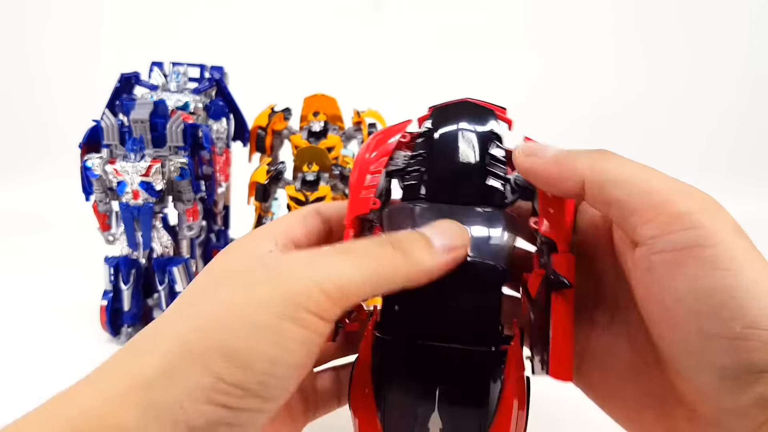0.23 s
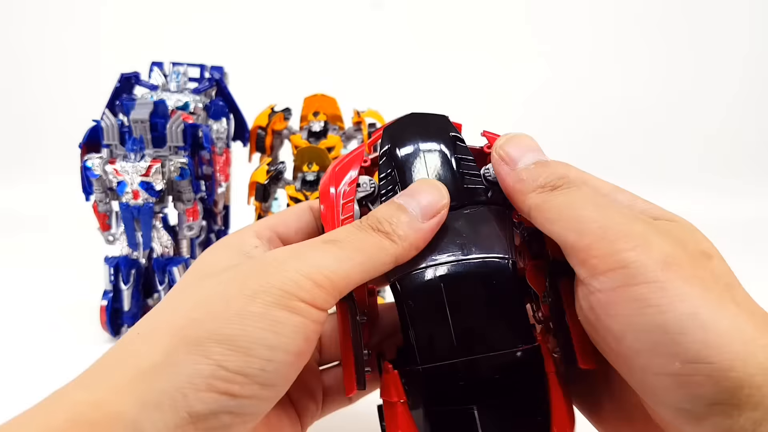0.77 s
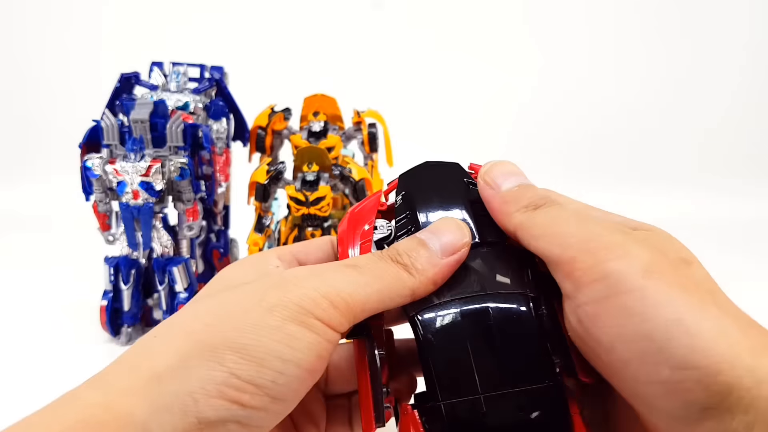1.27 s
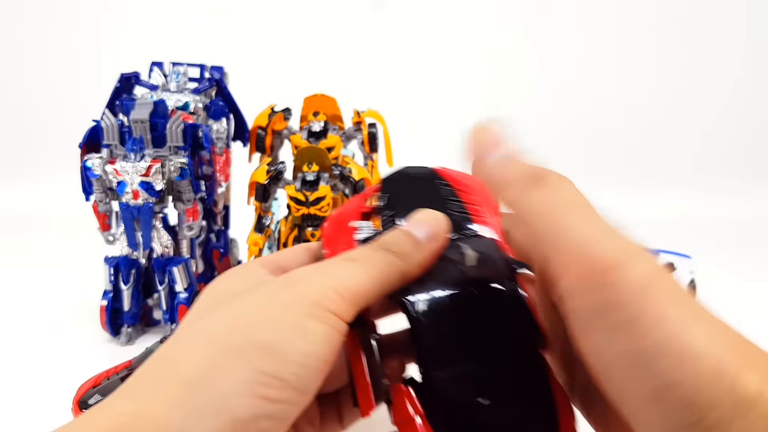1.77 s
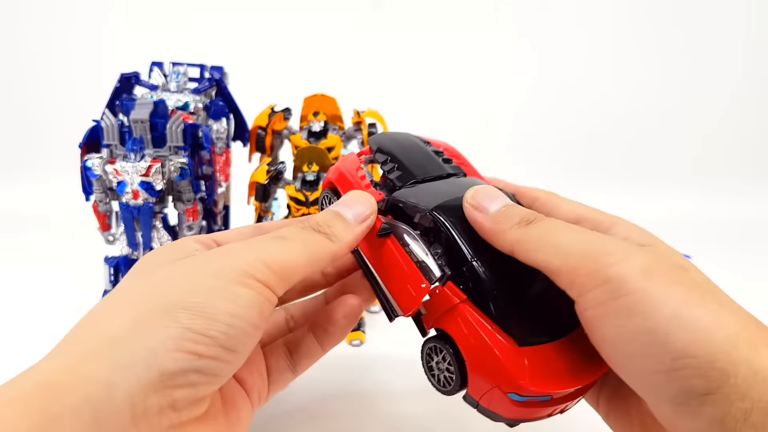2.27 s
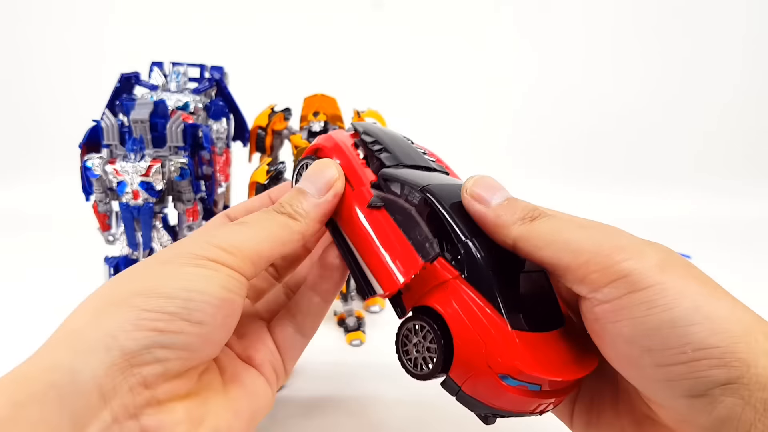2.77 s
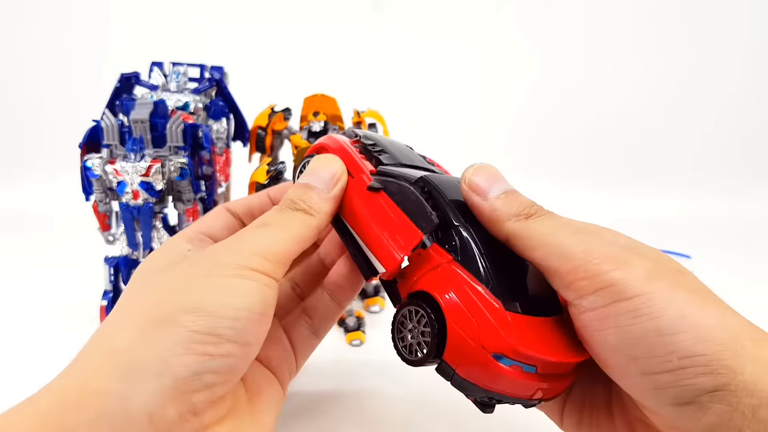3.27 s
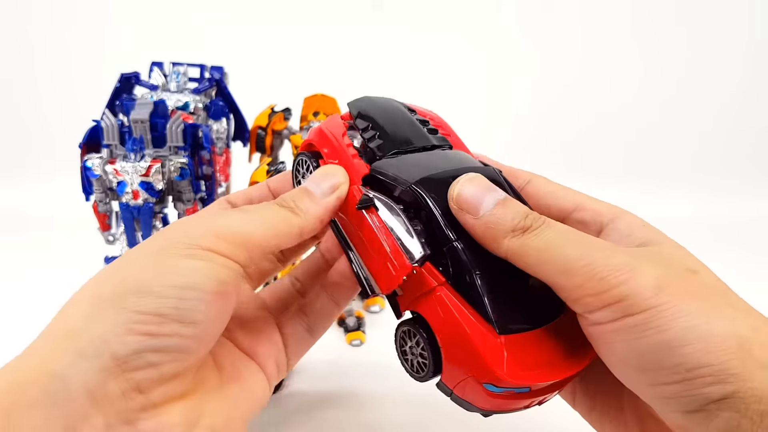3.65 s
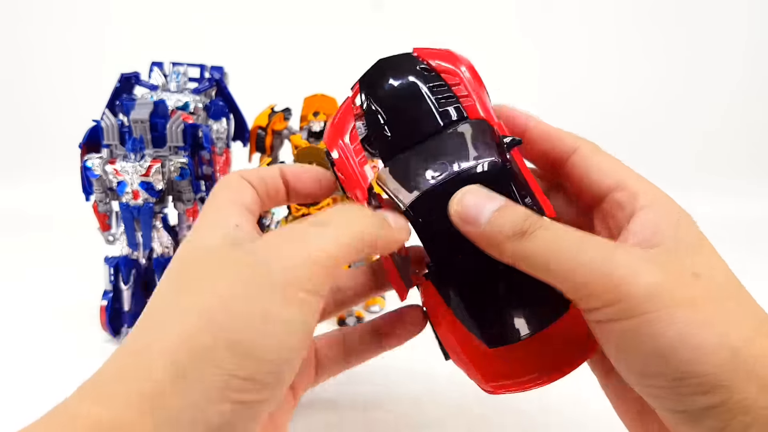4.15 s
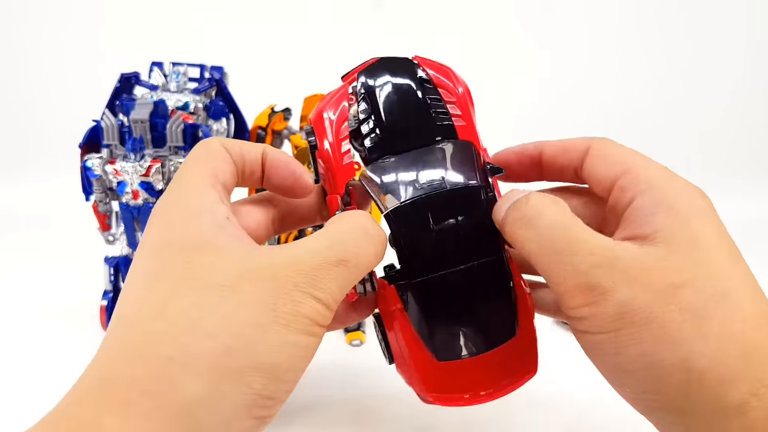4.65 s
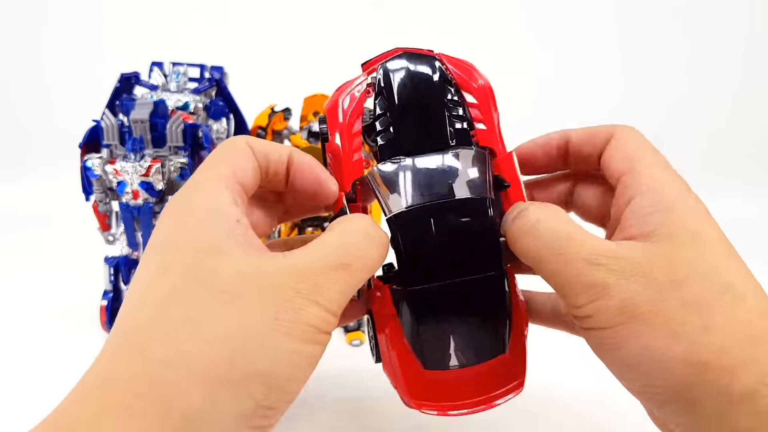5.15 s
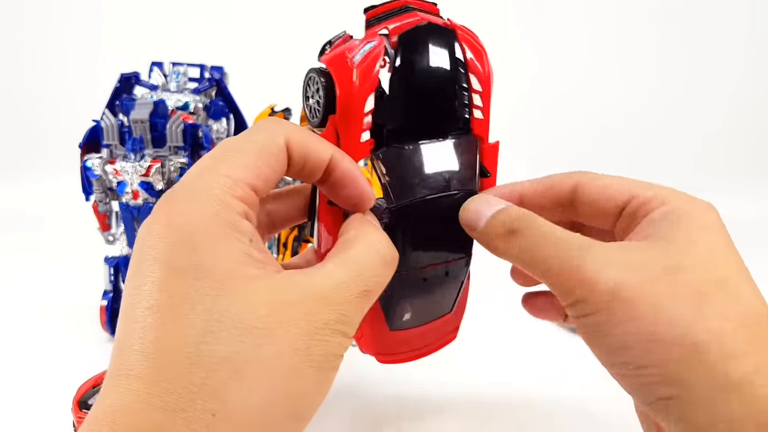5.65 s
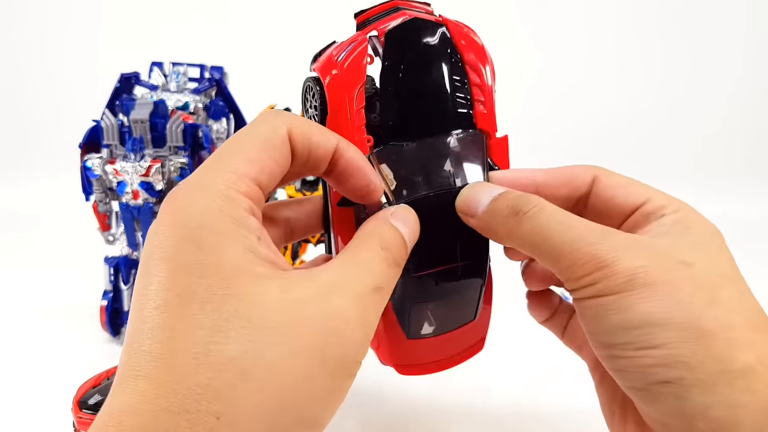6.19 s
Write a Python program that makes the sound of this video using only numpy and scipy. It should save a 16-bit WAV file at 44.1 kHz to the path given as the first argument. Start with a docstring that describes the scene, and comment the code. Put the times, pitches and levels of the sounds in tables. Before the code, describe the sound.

A hollow plastic toy car is folded by hand close to a stereo microphone in a small room. From 0 to 0.3 s a quick cluster of dry ticks comes over a light rub; after a short gap, irregular clicks and small knocks resume from 0.5 to 1.5 s, with a firmer click at 1.5. A loud hard snap lands at 1.7 s. Rubbing swells briefly at 2.0, and a very bright, sharp click follows at 2.34. Light ticks continue, one crisper at 2.9, then a soft deep table thump at 3.1. From 3.2 to 4.6 s the ticks are small and sparse, with a short scrape at 4.3. A solid click at 4.7 leads to the loudest snap at 4.96. After a pause, moderate clicks at 5.43 and 5.59 give way to weak ticks and a last brief rub near 6.37. Short bright reflections, quiet air, low rumble and a faint wavering hum remain underneath.

```python
"""In a small room, two hands fold a hollow plastic toy car shut close to a stereo microphone.
Hinges tick, panels knock and rub, and a few tabs snap home loudly: short noise bursts ring the shell's resonances.
Sliding parts add a faint stick-slip hiss; an arm bumps the table once, a deep thump of two fading sines.
The room answers with a short bright tail, over steady air, a low table rumble and a faint wavering hum."""
import sys
import numpy as np
from scipy import signal
from scipy.fft import rfft, irfft, next_fast_len
from scipy.io import wavfile

SR = 44100
rng = np.random.default_rng(int(sys.argv[2]) if len(sys.argv) > 2 else 0)


def unload_wav(signal):
    """Save mono or channel-first audio to the path in sys.argv[1] as 16-bit WAV at rate SR, clipped to [-1, 1]."""
    wavfile.write(
        sys.argv[1],
        SR,
        np.round(np.clip(np.atleast_2d(signal).T, -1, 1) * 32767).astype(np.int16),
    )


N = 283122

BUMP_S = 3.126  # when an arm bumps the table


def amp(db):
    """Decibels to gain."""
    return 10 ** (np.asarray(db) / 20)


def unit(x):
    """x at rms 1."""
    return x / np.sqrt(np.mean(x ** 2) + 1e-20)


def along(points, hz):
    """(frequency [Hz], value) points read on a log frequency axis."""
    f, v = np.transpose(points)
    return np.interp(np.log(hz + 1), np.log(f + 1), v)


def filtered(x, response):
    """x times a response of frequency."""
    m = next_fast_len(N + SR // 2)
    hz = np.fft.rfftfreq(m, 1 / SR)
    return irfft(rfft(x, m) * response(hz), m)[..., :N]


def causal(db):
    """The minimum-phase response with these dB per bin: it rings only after a blow."""
    cepstrum = irfft(np.log(amp(db)))
    half = cepstrum.shape[-1] // 2
    cepstrum[1:half] *= 2
    cepstrum[half + 1:] = 0
    return np.exp(rfft(cepstrum))


def lift_db(hz, centre, width, db):
    """The bump of one resonance."""
    return db / (1 + (2 * (hz - centre) / width) ** 2)


def shell_db(hz, vary=0):
    """Lift of the hollow shell's resonances; where it is struck varies their strengths."""
    # resonances of the shell: (centre [Hz], width [Hz], lift before variation [dB])
    modes = [(802, 130, 4), (1276, 160, 4.5), (1616, 110, 4), (1871, 53, 6), (2500, 200, 6),
             (2895, 110, 5.5), (3230, 440, 7.5), (3770, 440, 3.5), (4380, 88, 5), (5120, 120, 5),
             (7350, 1700, 1.5), (10690, 950, 8), (11440, 340, 6), (12880, 1000, 5.5), (14060, 1200, 6),
             (14700, 830, 9)]
    return sum(lift_db(hz, *mode) * (1 + vary * rng.standard_normal()) for mode in modes)


def ports(pair, hz):
    """Two unrelated spectra as left and right: alike in the bass, unrelated in the treble."""
    # likeness of the microphone's two sides: (frequency [Hz], correlation [0 to 1])
    likeness = [(100, .82), (500, .88), (1400, .94), (2500, .76), (4000, .45), (6000, .15), (9000, .05),
                (16000, .05)]
    turn = np.arccos(np.clip(along(likeness, hz), -1, 1)) / 2
    mid = pair[0] * np.cos(turn)
    side = pair[1] * np.sin(turn)
    return np.array([mid + side, mid - side])


def stereo(pair, colour_db):
    """Two unrelated signals as a coloured stereo sound of rms 1."""
    m = next_fast_len(N + SR // 4)
    hz = np.fft.rfftfreq(m, 1 / SR)
    spectra = ports(rfft(pair, m), hz) * amp(colour_db(hz))
    return unit(irfft(spectra, m)[:, :N])


def shaking(rumble_db=-55.5, sink_db_per_s=4, shake_db=-52.5, shake_db_per_s=38):
    """Strength of the rumble of the table under the arms: it settles slowly and swells once at the bump."""
    t = np.arange(N) / SR
    jolt = (t > BUMP_S) * amp(shake_db - shake_db_per_s * np.abs(t - BUMP_S))
    return np.hypot(amp(rumble_db - sink_db_per_s * t), jolt)


def background(air_db=-63, apart_db=-8, hum_hz=143, hum_db=-72):
    """Room air and table rumble as coloured noise, and a faint hum that wavers as a narrow noise band."""
    # colour of the room air: (frequency [Hz], relative density [dB per Hz])
    air_colour = [(22, -34.5), (45, -7.5), (74, -8), (145, -10), (240, -13), (350, -10.5), (600, -19),
                  (940, -25.5), (1560, -31), (2900, -30), (7700, -41), (12500, -42.5), (16000, -33)]
    # colour of the table rumble: (frequency [Hz], relative density [dB per Hz])
    rumble_colour = [(20, -26.5), (35, -12), (52, -1), (75, -1.5), (105, -14), (160, -19), (300, -22.5),
                     (800, -69)]
    air = stereo(rng.standard_normal((2, N)), lambda hz: along(air_colour, hz))
    deep_noise = filtered(rng.standard_normal((2, N)), lambda hz: amp(along(rumble_colour, hz)))
    mid, side = unit(deep_noise)
    apart = amp(apart_db) * side
    rumble = unit(np.array([mid + apart, mid - apart]))
    hum = unit(filtered(rng.standard_normal(N), lambda hz: 1 / (1 + ((hz - hum_hz) / 4) ** 2)))
    return amp(air_db) * air + shaking() * rumble + amp(hum_db) * hum


def sliding(attack_s=0.019, release_s=0.031, grip_db=-71):
    """Strength of the sliding: each stroke sets in, holds and lets go; the fingers never rest completely."""
    # strokes of panels and fingers: (time at full strength [s], hold [s], level before the rubbing trim [dB])
    strokes = [(0.067, 0.23, -59), (0.566, .06, -57), (0.764, 0.09, -57.5), (1.113, 0.019, -59),
               (1.22, .1, -62), (1.55, 0.14, -67.5), (1.876, .11, -57.5), (1.997, 0.048, -50),
               (2.162, 0.15, -62.5), (2.73, 0.091, -62.5), (3.027, .21, -60), (3.46, 0.033, -63),
               (4.103, 0.27, -64.5), (4.301, 0.052, -50.5), (4.43, 0.32, -60), (5.126, 0.17, -66),
               (5.482, 0.35, -65), (5.943, 0.26, -66.5), (6.369, 0.034, -53)]
    t = np.arange(N) / SR
    strengths = []
    for s, length, db in strokes:
        attack = np.clip((t - s) / attack_s + 1, 0, 1)
        release = np.exp(-np.maximum(t - s - length, 0) / release_s)
        strengths.append(amp(db) * attack * release)
    return np.maximum(amp(grip_db), np.max(strengths, axis=0))


def rubbing(level_db=-1, slips_per_s=200, spread_db=5, slip_t60=0.023, smooth_share=0.091):
    """Sliding plastic sticks and slips: tiny uneven ticks over a faint hiss, coloured by the shell."""
    # colour of the friction: (frequency [Hz], relative density before the shell [dB per Hz])
    friction_colour = [(100, -22), (400, -12), (950, -9.5), (1500, 2.5), (3000, -4), (5000, -4),
                       (8500, -13.5), (12500, -19.5), (16000, -30.5)]
    chance = rng.random(N)
    size = amp(spread_db * np.clip(rng.standard_normal(N), -2, 2))
    fade = amp(-60 * np.arange(SR // 20) / SR / slip_t60)
    slips = unit(signal.fftconvolve((chance < slips_per_s / SR) * size, fade)[:N])
    grit = (slips + smooth_share) * rng.standard_normal((2, N))
    rub = stereo(grit, lambda hz: along(friction_colour, hz) + shell_db(hz))
    return amp(level_db) * sliding() * rub


def contact_bands(thud, sizzle, part_hz):
    """Relative dB of thud, knock, middle, edge and sizzle: heavy contacts knock, hard ones have an edge."""
    def favoured(hz, octaves):
        """The struck part favours the band around its own pitch."""
        return 6.5 * np.exp(-(np.log2(part_hz / hz) / octaves) ** 2)

    knock = -3.5 + 0.18 * thud + favoured(1500, 0.32)
    edge = -3 + 0.38 * sizzle + favoured(5380, 0.34)
    return np.array([thud, knock, 0, edge, sizzle])


def click(bands_db, part_hz, t60, pan_db, rise=0.00047, hold=0.0025, chatter_db=4.0, part_db=6,
          part_width=0.15, treble_speed=1.1, treble_hz=7500, size=4096):
    """One contact: the parts chatter for a few ms and ring the struck part and the shell."""
    # borders of thud, knock, middle, edge and sizzle: [Hz]
    band_edges = [250, 1000, 2200, 4500, 9000, 16000]
    # colour of a contact before shell, part and band levels: (frequency [Hz], relative density [dB per Hz])
    contact_colour = [(40, -21.5), (150, -8), (400, -4.5), (950, -7.5), (1500, -1), (3000, 2), (5000, -0.5),
                      (8500, -8), (12500, -14), (16000, -23.5)]
    t, hz = np.arange(size) / SR, np.fft.rfftfreq(size, 1 / SR)
    chatter = np.interp(t, t[::16], rng.standard_normal(size // 16))
    grit = amp(chatter_db * chatter) * rng.standard_normal((2, size))

    def force(u):
        """Spectra of the chattering noise, rising, holding and fading along the time u."""
        attack = 1 - np.exp(-(u / rise) ** 2)
        fade = amp(-60 * np.maximum(u - hold, 0) / t60)
        return rfft(grit * attack * fade)

    # the treble comes and goes faster than the body
    treble = 1 - 1 / (1 + (hz / treble_hz) ** 4)
    blow = (1 - treble) * force(t) + treble * force(t * treble_speed)
    colour_db = along(contact_colour, hz) + shell_db(hz, vary=0.39)
    colour_db = colour_db + lift_db(hz, part_hz, part_width * part_hz, part_db)
    # hands and shell shade one side, mostly in the treble
    shade_db = pan_db / 2 * hz ** 2 / (hz ** 2 + 2000 ** 2)
    ring = ports(blow, hz) * [causal(colour_db + shade_db), causal(colour_db - shade_db)]
    bands = list(zip(band_edges[:-1], band_edges[1:]))
    centres = [np.sqrt(lo * hi) for lo, hi in bands]
    # two passes bring the bands close to their levels: energy spread over 10 ms
    for _ in range(2):
        power = np.mean(np.abs(ring) ** 2, axis=0) * 2 / size / (SR / 100)
        own_db = [10 * np.log10(power[(hz >= lo) & (hz < hi)].sum()) for lo, hi in bands]
        correction = np.transpose([centres, bands_db - np.array(own_db)])
        ring = ring * causal(along(correction, hz))
    return irfft(ring)


def clicks(level_db=0, left_db=1):
    """Every tick, knock and snap of the parts, each a contact that rings the shell."""
    # contacts: (time [s], level near 3 kHz [dB], thud [dB re level], sizzle [dB re level],
    # pitch of the struck part [Hz], t60 before a 5 ms floor [s], left over right before left_db [dB])
    contacts = [(0.0239, -45.5, -9, -10, 2500, 0.036, 0.5), (0.1006, -46, -22, -10, 3580, 0.058, 1),
                (.112, -39, -20, -10.5, 2880, 0.011, 2), (0.1489, -47.5, -23, -6.5, 1630, .022, -1),
                (0.2108, -45, -23, -9.5, 1950, .015, -3), (0.239, -54.5, -16, -1, 3150, .039, 3),
                (.4826, -57, -4, -9.5, 2960, .023, 0), (0.5712, -51, -5, -9, 4460, 0.034, 2),
                (0.5814, -50.5, -7, -14, 3140, 0.032, 0), (.651, -42, -15, -15.5, 2340, 0.031, 1),
                (.8061, -41, -20, -21, 3230, 0.033, 1), (.8552, -48.5, -9, -9.5, 4900, 0.041, -1),
                (0.886, -53, -9, -17, 2480, .043, 6), (.932, -47, -9.5, -7.5, 2950, .062, 1),
                (.942, -46, -12.5, -30, 3130, 0.033, -1), (0.996, -46.5, -20, -5, 3200, 0.066, -2),
                (1.0084, -46.5, -8, -16, 1520, 0.051, -1), (1.2025, -51.5, -14, -12, 1830, .038, 1),
                (1.3002, -42.5, -15.5, -3.5, 4750, 0.035, -1), (1.321, -49.5, -13, -16, 3200, 0.068, -6),
                (1.3358, -50.5, -25, -10, 3300, .023, 0), (1.428, -45, -15.5, -15, 1410, 0.031, 1),
                (1.4374, -46.5, -34, -12, 3210, 0.0079, -1), (1.4992, -39.5, -26, -5.5, 4740, .011, 1),
                (1.5146, -34, -27.5, -6, 3360, 0.015, -2.5), (1.6261, -46, -19, -11.5, 5010, 0.018, -3),
                (1.7095, -29, -12.5, -5.5, 3190, 0.025, 0), (1.88, -46.5, -12.5, -22, 2050, 0.039, -1),
                (1.9519, -45, -18, 7.5, 4460, .013, 2), (1.963, -50.5, -15, -11, 3070, 0.07, 2),
                (2.0246, -44.5, -23, -16, 1530, 0.024, -2), (2.0553, -50, -17, -11, 1300, .012, 2),
                (2.1341, -42, -26, -2.5, 4280, 0.021, 2), (2.3314, -55.5, -4, -2, 1610, 0.049, 5),
                (2.3424, -35, -12.5, 10.5, 3880, 0.016, 1.5), (2.3667, -45, -22, -5, 4400, 0.15, -4),
                (2.408, -49, -19, -7, 2200, .037, -4), (2.5705, -44.5, -30, -5.5, 2500, .02, 1),
                (2.614, -44.5, -39, -13.5, 3840, .012, -3), (2.7133, -47.5, -22, -8, 2200, 0.0092, 1),
                (2.8857, -58.5, -17, 5.5, 5630, 0.013, 3), (2.895, -57, -3, -2, 5650, 0.048, 14),
                (2.905, -39, -44.5, -12.5, 5370, 0.011, -0.5), (2.914, -50.5, -15, -22, 3730, 0.021, 1),
                (3.0814, -53.5, -10, 2, 1630, 0.0089, 2), (3.114, -50.5, -4, -0.5, 6160, 0.021, 3),
                (3.1872, -52.5, -15, 1, 5640, 0.013, -2), (3.2091, -48, -30, -7, 4180, 0.019, -1),
                (3.2757, -49, -15, -16.5, 4930, .014, 1.5), (3.485, -46.5, -19, -9, 3840, .011, 4),
                (3.492, -49.5, -28, -12, 3850, .012, -2), (3.5596, -47.5, -13.5, -13.5, 2440, 0.036, 2.5),
                (3.7834, -55.5, -18, 7, 5300, 0.051, 7), (3.7954, -45.5, -12, -18, 2220, 0.028, -7),
                (3.8137, -46, -19, -0.5, 5900, 0.017, 4), (3.89, -54.5, -23, -9.5, 5700, .015, 2),
                (3.976, -56.5, -13, -11, 3800, .022, 3), (4.086, -47.5, -21, -8, 1650, 0.041, 2),
                (4.1145, -50, -19.5, -10, 2840, 0.072, 1), (4.169, -51.5, -12, -11, 1650, 0.023, 4),
                (4.285, -42.5, -15, -11, 4800, 0.0091, 1.5), (4.4797, -53, -17, -10, 2180, 0.028, 3),
                (4.5287, -50.5, -20, -10, 2670, .008, 0), (4.555, -50.5, -21, -17, 2560, 0.045, 2),
                (4.5867, -51, -26, -7, 3800, .026, -2), (4.6713, -54, -5, -12, 4490, 0.0073, 4),
                (4.6883, -44, -15, -7, 5500, 0.019, 2), (4.7033, -39, -18, -5, 2160, 0.046, .5),
                (4.7986, -49.5, -28.5, -25, 3560, 0.013, -3), (4.807, -49.5, -28, -13, 3320, 0.031, 1),
                (4.9157, -43, -8, -14, 1280, 0.034, 0), (4.9547, -47, -2.5, -9, 4960, 0.0068, 0),
                (4.9582, -27, -16, -7, 2390, 0.032, -.5), (5.378, -49.5, -3, -13, 1160, 0.048, -1),
                (5.4194, -51.5, -6, -9, 2760, 0.018, -3), (5.4268, -37, -10.5, -8, 2660, 0.019, 1),
                (5.533, -51.5, -3, -1, 3120, 0.053, -1), (5.5863, -41, -10.5, -8.5, 2440, 0.026, 1),
                (5.603, -52.5, -0.5, -9, 4500, 0.089, -4), (5.7144, -53, -9, -0.5, 5340, .067, -1),
                (5.7456, -47, -6.5, -19, 2850, 0.028, 1), (5.902, -53, -8, -14, 1140, .025, -1),
                (5.9234, -54, -1, -8, 3330, 0.033, -1), (5.9726, -55.5, -8, -8, 1140, 0.065, -1),
                (6.0339, -48, -12.5, -11, 2900, 0.03, 0), (6.1673, -54, -14.5, -10, 2860, 0.0071, -2)]
    out = np.zeros((2, N + SR))
    for s, db, thud, sizzle, part_hz, t60, pan in contacts:
        bands_db = db + contact_bands(thud, sizzle, part_hz)
        sound = click(bands_db, part_hz, max(t60, .005), pan + left_db)
        out[:, round(s * SR):][:, :sound.shape[1]] += sound
    return amp(level_db) * out[:, :N]


def room(x, delay=.005, count=16):
    """The walls' tail, decaying noise; it changes in steps as the toy moves in the hands."""
    # decay of the room: (frequency [Hz], t60 [s])
    decay = [(200, 0.24), (800, 0.57), (2500, 0.45), (5500, 0.36), (11000, 0.4), (16000, 0.21)]
    # colour of the reflections: (frequency [Hz], relative reflected level [dB])
    wall_colour = [(100, 2), (600, 3.5), (1400, 0), (2000, 0), (2500, 5), (3200, -0.5), (4500, 2),
                   (8000, 0), (11000, -3.5), (16000, 4)]
    out, t = np.zeros((2, N + 2 * SR)), np.arange(N)
    for part in np.array_split(t, count):
        hz, s, z = signal.stft(rng.standard_normal((2, SR // 2)), SR, nperseg=256)
        z = z * amp(along(wall_colour, hz)[:, None] - 60 * s / along(decay, hz)[:, None])
        # doubled Hz: sound from all sides reaches the two ports less alike than the direct sound
        tail = signal.istft(ports(z, hz[:, None] * 2), SR, nperseg=256)[1]
        wet = signal.fftconvolve(x[:, part], tail / np.linalg.norm(tail[0]), axes=1)
        out[:, part[0] + round(delay * SR):][:, :wet.shape[1]] += wet
    return out[:, :N]


def bump(level_db=-40, low_hz=72, high_hz=108, t60=0.15, rise=0.004):
    """A soft, deep thump of an arm against the table: two low sines that fade together."""
    t = np.maximum(np.arange(N) / SR - BUMP_S, 0)
    ring = np.sin(2 * np.pi * low_hz * t) + np.sin(2 * np.pi * high_hz * t)
    return amp(level_db - 60 * t / t60) * (1 - np.exp(-t / rise)) * ring


def scene(room_db=-12):
    """The toy near the microphone, in its room, with the bump and the background."""
    toy = clicks() + rubbing()
    return toy + amp(room_db) * room(toy) + bump() + background()


def record(dry, top_hz=16050):
    """The recorder's band limit: a very steep low-pass."""
    return filtered(dry, lambda hz: 1 / np.sqrt(1 + (hz / top_hz) ** 120))


dry = scene()
out = record(dry)
unload_wav(out)
```